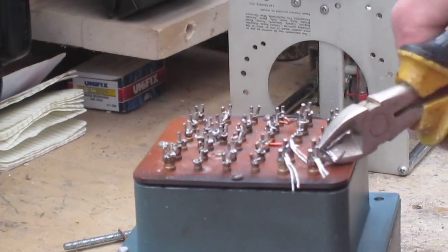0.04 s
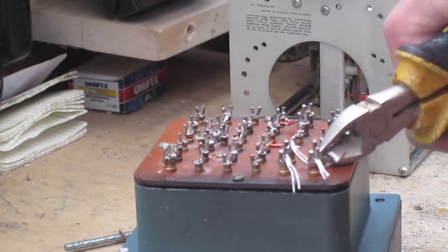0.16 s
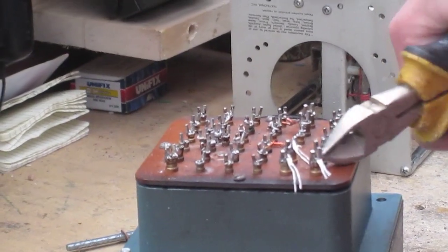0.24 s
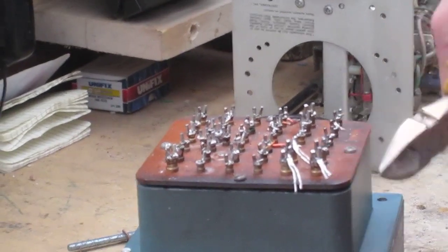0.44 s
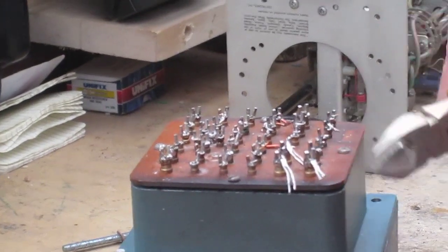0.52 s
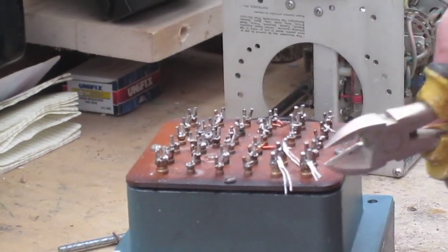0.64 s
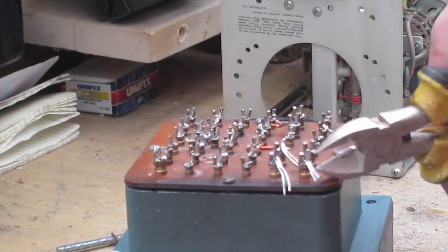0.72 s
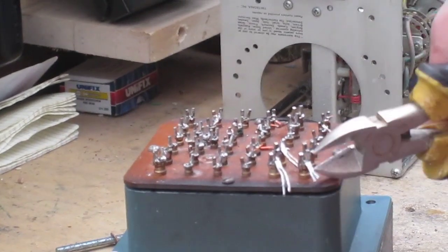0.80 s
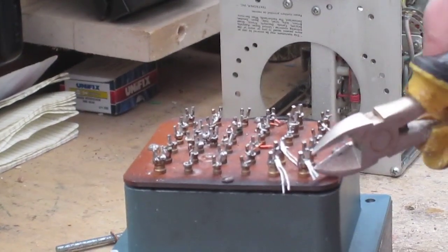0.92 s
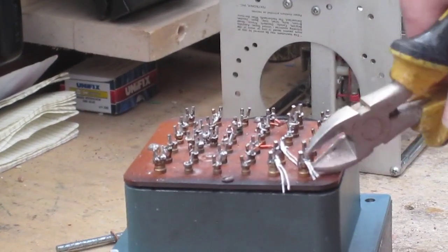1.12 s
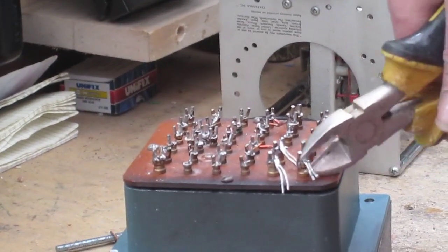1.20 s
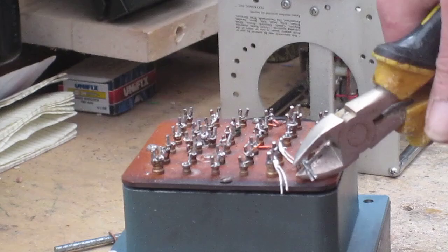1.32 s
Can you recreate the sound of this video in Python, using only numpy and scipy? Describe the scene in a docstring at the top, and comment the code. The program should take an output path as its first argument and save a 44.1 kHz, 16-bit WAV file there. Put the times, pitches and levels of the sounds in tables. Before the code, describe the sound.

A hard snap of wire cutters, followed by faint ticks, scrapes and bench knocks in a workshop

```python
"""In a small workshop, side cutters bite and snap a wire on a little terminal board.
The jaws tick and scrape on the pins, a steel part pings, and knocks and low thumps sound on the bench.
Impacts are decaying modes with noise cracks, rattles and scattered room tails; scrapes are trains of tiny slips.
Shaped noise makes the hum and hiss, bending sines the faint whistles, a restarting tone the camera's whine.
The camera's gain control ducks after loud sounds such as the snap, then slowly recovers."""
import sys
import numpy as np
from scipy import signal
from scipy.io import wavfile
from scipy.ndimage import uniform_filter1d

SR = 44100
rng = np.random.default_rng(int(sys.argv[2]) if len(sys.argv) > 2 else 0)


def wav_record(signal):
    """Record a signal, one row per channel, as 16-bit PCM in the file named by sys.argv[1]."""
    frames = np.transpose(np.atleast_2d(signal))
    bounded = np.clip(frames, -1, 1)
    # unit amplitude maps onto the largest positive 16-bit level
    quanta = np.round(bounded * 32767).astype(np.int16)
    wavfile.write(sys.argv[1], SR, quanta)


def ratio(d):
    """dB to gain"""
    e = np.asarray(d, float) / 20
    return 10 ** e


N = 59535  # samples, 1.35 s

# modes of the jaw tips, rung by ticks and scrapes: pitch_hz [Hz], relative level_db [dB], t60_s [s]
TIP_MODES = [(2001, 0, 0.0099), (2820, 7.5, 0.0064), (4610, -2.5, 0.0027), (5900, -8, 0.0087),
             (8210, -15.5, 0.0043), (9870, -11, 0.0056), (12300, -6.5, 0.0029), (13900, -18.5, 0.0026)]


def read(points, hz):
    """Reads a curve of (Hz, value) points along a logarithmic frequency axis."""
    f, value = np.transpose(points)
    return np.interp(np.log(hz + 1), np.log(f + 1), value)


def evened(x):
    """Scales a signal to an RMS of one."""
    return x / np.sqrt(np.mean(x ** 2) + 1e-20)


def causal(gain):
    """The shortest causal (minimum-phase) pulse with this gain on the full circle of 4096 bins."""
    log_spectrum = np.conj(signal.hilbert(np.log(gain + 1e-5)))
    return np.fft.ifft(np.exp(log_spectrum)).real[:2048]


def resonate(x, hz, width):
    """A gliding resonance: shifts the curve hz down to zero, smooths twice, and shifts back."""
    turn = np.exp(2j * np.pi * np.cumsum(hz * np.ones(len(x))) / SR)
    r = np.exp(-np.pi * abs(width) / SR)
    smooth = signal.lfilter([1], np.convolve([1, -r], [1, -r]), x / turn)
    return (turn * smooth).real


def struck(modes, t, tilt, pitch, detune, held_s=1., crack_db=-60.):
    """A ring of decaying modes, peak 1, and a burst: the modes blurred by a contact of held_s, over a wide crack."""
    hz, db, t60 = np.transpose(modes)[:, :, None]
    luck = rng.standard_normal((len(modes), 2))
    f = hz * pitch * (1 + detune * luck[:, :1])
    gain = ratio(db + tilt * np.log2(hz / 2000))
    tones = np.sin(2 * np.pi * f * t + 1.1 * luck[:, 1:])
    ring = (gain * ratio(-60 * t / t60) * tones).sum(axis=0)
    peak = abs(ring).max()

    bins = abs(np.fft.fftfreq(4096, 1 / SR))
    damping = np.log(1000) / t60 + 1 / held_s  # a short contact broadens each mode
    blurred = (gain * SR / 2 / peak) ** 2 / (damping ** 2 + (2 * np.pi * (bins - f)) ** 2)
    wide = ratio(crack_db + tilt * np.log2(bins / 2000 + 0.116))
    return ring / peak, causal(np.sqrt(blurred.sum(axis=0) + wide ** 2))


def room(room_db):
    """Dense scattered reflections, each band dying at its own speed."""
    # decay of the reflections: pitch_hz [Hz], t60_s [s]
    decay_times = [(200, 0.93), (700, 0.2), (2000, 0.16), (5000, 0.15), (10000, 0.098), (16000, 0.17)]
    hz, t, z = signal.stft(rng.standard_normal(SR // 2), SR, nperseg=128)
    tail = signal.istft(z * ratio(-60 * t / read(decay_times, hz)[:, None]), SR, nperseg=128)[1]
    tail = tail * np.clip(np.arange(len(tail)) / SR / 0.0036 - .5, 0, 1) ** 2.9  # builds from 1.8 to 5.4 ms
    return ratio(room_db) * tail / np.linalg.norm(tail)


def blows(rows, modes, crack_db, room_db, crack_s, held_s, detune, rattle_db, rise_s):
    """Every blow rises quickly, cracks, rings the modes of the struck thing and rattles on; its burst fills the room.

    Rows: start_s, level_db of the ring, tilt in dB per octave, pitch factor, rattle_s."""
    out, t = np.zeros(N + 2 * SR), np.arange(SR // 4) / SR
    for start_s, level_db, tilt, pitch, rattle_s in rows:
        ring, burst = struck(modes, t, tilt, pitch, detune, held_s, crack_db)
        crack_level = ratio(crack_db + 1.92 * tilt) * .5
        crack = crack_level * rng.standard_normal(len(t)) * np.exp(-t / crack_s)
        rattle = ratio(rattle_db) * rng.standard_normal(len(t)) * np.exp(-t / rattle_s)
        sound = signal.fftconvolve(burst, room(room_db))
        sound[:len(t)] += (ring + crack) * (1 - np.exp(-t / rise_s)) ** 2
        sound[:len(t)] += signal.fftconvolve(rattle, burst)[:len(t)]
        out[round(start_s * SR):][:len(sound)] += ratio(level_db) * sound
    return out[:N]


def snap():
    """The wire gives way: a hard crack sets jaws and board ringing."""
    # the cut: start_s [s], level_db of the ring [dB]
    cuts = [(.2582, 2)]
    # modes of jaws and board: pitch_hz [Hz], relative level_db [dB], t60_s [s]
    jaw_modes = [(675.5, -14, 0.24), (884, -3.5, 0.045), (1674, -11.5, .05), (1733, 2.5, 0.035),
                 (1826, 1, 0.096), (2013, 0.5, 0.0397), (2075, -13, 0.088), (2990, -1, 0.0081),
                 (3790, 0, 0.017), (4850, 4.5, 0.007), (5220, 1, 0.018), (5465, -13, 0.022),
                 (6800, 1, 0.0057), (8950, 8, 0.0026), (10700, 4.5, .002)]
    rows = [(*cut, 0, 1, .004) for cut in cuts]
    return blows(rows, jaw_modes, crack_db=2, room_db=2.5, crack_s=0.0012, held_s=0.0012,
                 detune=0.0043, rattle_db=-21.5, rise_s=.0001)


def bites():
    """The blades bite into the wire and ring briefly, with little crack or room."""
    # bites: start_s [s], level_db of the ring [dB], treble_tilt [dB per octave]
    contacts = [(.2395, -9, 0), (.7970, -30, 3)]
    # modes of the blades: pitch_hz [Hz], relative level_db [dB], t60_s [s]
    blade_modes = [(810, -19, .02), (1350, -11, .02), (1670, -5, .02), (2030, -8, .015), (2960, 6, .004),
                   (3520, 0, .0035), (4920, -16, .004), (8330, -5, .004), (9000, -5, .003),
                   (9700, -8, .0035), (15000, -3, .002)]
    rows = [(*contact, 1, .0007) for contact in contacts]
    return blows(rows, blade_modes, crack_db=-37.5, room_db=-33.5, crack_s=.0003, held_s=.0012,
                 detune=0.006, rattle_db=-34, rise_s=.0001)


def ticks():
    """Jaw tips touch pins and wire: very short bright rings."""
    # touches: start_s [s], level_db of the ring [dB], treble_tilt [dB per octave]
    touches = [(0.2062, -43, 3), (0.4652, -43.5, -8), (0.5192, -30.5, -2), (0.6888, -43, -7),
               (0.78, -39, 4), (0.8016, -31.5, 1), (0.8102, -16.5, 4), (0.9468, -49, 4), (1.1337, -47, 10),
               (1.2485, -37.5, 4), (1.2744, -43, 11.5), (1.3136, -51, -4)]
    rows = [(*touch, 1, .0006) for touch in touches]
    return blows(rows, TIP_MODES, crack_db=-13, room_db=-29, crack_s=.0002, held_s=.0011,
                 detune=0.013, rattle_db=-18.0, rise_s=0.000087)


def scrapes():
    """Jaw tips scrape along the pins: tiny uneven slips, each ringing the tips."""
    # scrapes: start_s [s], length_s [s], level_db over that length [dB], treble_tilt [dB per octave]
    strokes = [(0.505, 0.035, -61.5, 0), (0.681, 0.012, -50, -2), (0.802, 0.015, -47, -0.5),
               (0.943, 0.0097, -59, 2), (1.136, 0.0055, -53.5, 6), (1.243, 0.015, -57, -5),
               (1.268, 0.026, -62, 3), (1.299, 0.025, -53.5, 1)]
    slips_per_s = 5000  # on average
    out, t = np.zeros(N + SR), np.arange(SR // 40) / SR
    for start_s, length_s, level_db, tilt in strokes:
        u = np.arange(SR // 20) / SR / length_s
        draw, size = rng.random((SR // 20, 2)).T
        slips = (draw < slips_per_s / SR) * (size - .5) * np.sin(np.pi * np.minimum(u, 1))
        sound = signal.fftconvolve(slips, struck(TIP_MODES, t, tilt, 1.0, 0.1)[0])
        rms = np.sqrt((sound ** 2).sum() / (length_s * SR) + 1e-20)
        out[round(start_s * SR):][:len(sound)] += ratio(level_db) * sound / rms
    return out[:N]


def pings():
    """A small steel part is struck and rings clear, lightly damped modes."""
    # pings: start_s [s], level_db of the ring [dB]
    strikes = [(0.8565, -30.5)]
    # modes of the part: pitch_hz [Hz], relative level_db [dB], t60_s [s]
    steel_modes = [(1210, -9, 0.35), (1840, -1, 0.037), (2560, -14, 0.024), (4170, -14.5, 0.09),
                   (5000, -9, 0.065), (8400, 1, 0.039), (9900, -19.5, 0.23), (12000, 0, 0.1),
                   (12840, -8, 0.11), (13180, -2.5, 0.1)]
    rows = [(*strike, 0, 1, .01) for strike in strikes]
    return blows(rows, steel_modes, crack_db=-6, room_db=4.5, crack_s=0.00019, held_s=0.0018,
                 detune=0.00077, rattle_db=-18.5, rise_s=.0001)


def knocks():
    """Knocks on the bench: heavily damped modes with a soft rattle."""
    # knocks: start_s [s], level_db of the ring [dB], treble_tilt [dB per octave], pitch [factor], rattle_s [s]
    hits = [(0.457, -36.5, -4, 0.72, 0.014), (0.709, -30, -7.5, 1.075, 0.034),
            (0.903, -31, -10.5, 1.04, 0.025), (1.0402, -20.5, 6, 0.94, 0.0083),
            (1.0426, -20.5, -13, 0.87, 0.0042), (1.1431, -24.5, -5, 0.98, 0.011),
            (1.2157, -25, -0.5, 1.12, 0.0038), (1.2185, -23, -16, 1.05, 0.014),
            (1.2325, -35, -5, 0.92, 0.0059), (1.289, -30.5, -18, 0.93, 0.013)]
    # modes of the bench: pitch_hz before that factor [Hz], relative level_db [dB], t60_s [s]
    bench_modes = [(300, -18.5, 0.084), (436, -11.5, 0.019), (684, -12, 0.078), (888, 6.5, 0.045),
                   (968, 5.5, 0.048), (1450, 0, 0.0073), (1910, 7, 0.01), (2330, -2, 0.013),
                   (3203, 2, 0.007), (4780, -11.5, 0.014), (7460, -9, 0.0027)]
    return blows(hits, bench_modes, crack_db=-14.5, room_db=2.5, crack_s=0.001, held_s=0.0044,
                 detune=0.014, rattle_db=-24.0, rise_s=0.00014)


def microphone(near):
    """Colours the near sounds with the way they reach the camera: less bass and top treble."""
    # response: pitch_hz [Hz], level_db [dB]
    response = [(20, -32), (150, -7), (300, -4), (10500, 4.5), (12500, -9), (16000, -24.5)]
    colour = causal(ratio(read(response, abs(np.fft.fftfreq(4096, 1 / SR)))))
    return signal.oaconvolve(near, colour)[:N]


def thumps():
    """Low swells: just after the snap, the two lowest modes of jaws and board ring up, and soft thumps sound
    through the bench; each low mode swells in and dies."""
    # low modes, the first two of the snapping jaws and board, the rest thumps on the bench: start_s [s],
    # level_db before the swell [dB], pitch_hz [Hz], t60_s [s]
    bumps = [(.264, -27, 234.7, .15), (.266, -25, 317.5, 0.13), (0.949, -28, 250, 0.097),
             (1.05, -35, 321, 0.059), (1.162, -22.5, 332, 0.028), (1.223, -36.5, 317, 0.3),
             (1.297, -31, 300, 0.086)]
    rise_s = 0.0042
    start_s, db, hz, t60 = np.transpose(bumps)[:, :, None]
    t = np.maximum(np.arange(N) / SR - start_s, 0)
    swell = 1 - np.exp(-t / rise_s)
    return (ratio(db - 60 * t / t60) * swell * np.sin(2 * np.pi * hz * t)).sum(axis=0)


def whistles():
    """Faint far whistles: thin, slightly fuzzy tones; any bend comes early and levels off."""
    # whistles: start_s [s], length_s [s], start_hz [Hz], end_hz [Hz], level_db [dB]
    tones = [(.35, .06, 3150, 3200, -69), (.46, .07, 3150, 3200, -68), (.535, .155, 2200, 2540, -61),
             (.592, .06, 3200, 3200, -61), (.81, .03, 3650, 3650, -62), (.81, .03, 4300, 4300, -62),
             (.87, .05, 3200, 3200, -66), (.99, .025, 3200, 3200, -64), (1.01, .03, 2150, 2200, -62)]
    out = np.zeros(N + SR)
    for start_s, length_s, from_hz, to_hz, level_db in tones:
        u = np.linspace(0, 1, round(length_s * SR))
        turns = np.cumsum(to_hz + (from_hz - to_hz) * (1 - u) ** 2) / SR
        fuzz = 1 + .25 * evened(uniform_filter1d(rng.standard_normal(len(u)), size=300))
        swell = np.sin(np.pi * u) ** 1.1
        out[round(start_s * SR):][:len(u)] += ratio(level_db) * fuzz * swell * np.sin(2 * np.pi * turns)
    return out[:N]


def hiss():
    """Noise in a few soft resonant bands that sink in pitch at first, under one level curve."""
    # bands: pitch_hz at the start [Hz], width_hz [Hz], level_db before the level curve [dB]
    soft_bands = [(2160, 300, -60), (4360, 620, -63), (902, 790, -64.5), (7000, 14000, -78)]
    # level curve: time_s [s], added level_db [dB]
    level_curve = [(0, 5.5), (0.121, 4.5), (.2, -0.5), (.3, -1.5), (.45, -5.5), (.6, -31), (.75, -26),
                   (1.0, -36), (1.35, -39)]
    t = np.arange(N) / SR
    sag = 1 - 0.41 * np.minimum(t, .3)  # share of the pitch lost per second, for 0.3 s
    noise = np.zeros(N)
    for hz, width, level_db in soft_bands:
        noise += ratio(level_db) * evened(resonate(rng.standard_normal(N), hz * sag, width))
    return noise * ratio(np.interp(t, *np.transpose(level_curve)))


def hum():
    """Low workshop rumble and air noise that slowly sinks; drifting patches above the bass."""
    # noise spectrum: pitch_hz [Hz], relative density_db [dB per Hz]
    spectrum = [(12, 4.5), (28, 4), (264, -11.5), (998, -28.5), (1370, -31), (2470, -32), (3220, -34),
                (4800, -43.5), (7950, -45.5), (11500, -52.5), (15500, -55.5), (22000, -72)]
    level_db, slope_db_per_s = -42.5, -1.5  # the level is that at 0.1 s
    frames, hz = N // 256 + 5, np.fft.rfftfreq(1024, 1 / SR)
    a, b, patches = rng.standard_normal((frames, 513, 3)).T
    patches = uniform_filter1d(uniform_filter1d(patches, size=10, axis=0), size=10, axis=1)
    patches_db = 2.2 * np.clip(hz / 400, 0, 1)[:, None] * evened(patches)
    z = (a + 1j * b) * ratio(read(spectrum, hz)[:, None] + patches_db)
    noise = evened(signal.istft(z, nperseg=1024, noverlap=768)[1][:N])
    return ratio(level_db + slope_db_per_s * (np.arange(N) / SR - 0.1)) * noise


def whine():
    """Camera electronics: a thin tone that restarts about 30 times a second with a short burst at its own pitch."""
    period_s, first_s, pitch_hz = 1001 / 30000, .0113, 7867.13
    burst_s = .0011  # time from restart to the burst's peak
    t = (np.arange(N) / SR - first_s) % period_s
    u, phase = t / burst_s, 2 * np.pi * pitch_hz * t
    burst = ratio(-46) * u * np.exp(-u) * np.sin(phase)
    return ratio(-68) * np.cos(phase) + burst


def scene():
    """Near sounds pass the microphone colour; thumps and background join after it."""
    near = snap() + bites() + ticks() + pings() + knocks() + scrapes()
    return (microphone(near) + thumps() + hum() + hiss() + whistles() + whine())[None]


def gain_control(x):
    """Cuts the level soon after a loud sound, then recovers slowly at a steady rate."""
    duck_from_db, duck_share, recover_db_per_s = -35, .29, 8  # share: dB of cut per dB above the threshold
    power_db = 10 * np.log10(signal.lfilter([.002], [1, -.998], x[0] ** 2) + 1e-12)
    fall = np.arange(N) * recover_db_per_s / SR
    held_db = np.maximum.accumulate(duck_share * (power_db - duck_from_db) + fall) - fall
    cut_db = np.maximum(held_db, 0)
    slow = np.exp(-1 / (.012 * SR))  # the cut follows with a 12 ms lag
    return x / ratio(signal.lfilter([1 - slow], [1, -slow], cut_db))


def top_cut(x):
    """Nothing passes above the cut-off."""
    return signal.sosfilt(signal.butter(12, 16000, fs=SR, output="sos"), x)


def record(dry):
    """Gain control, then the band limit at 15.9 kHz and clipping."""
    x = gain_control(dry)
    band_limit = signal.firwin(255, 15900, window=("kaiser", 8), fs=SR)
    x = signal.oaconvolve(x, band_limit[None], "same")
    return top_cut(np.clip(x, -1, 1))


dry = scene()
out = record(dry)
wav_record(out)
```